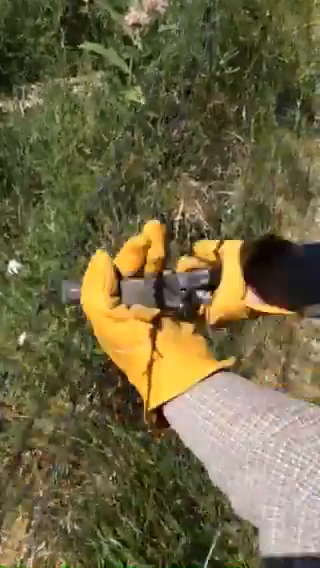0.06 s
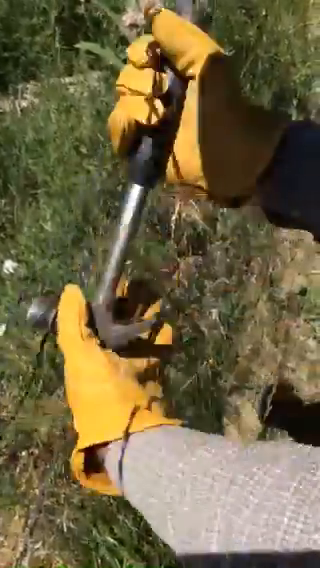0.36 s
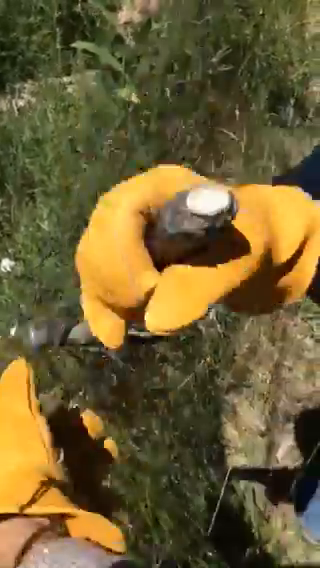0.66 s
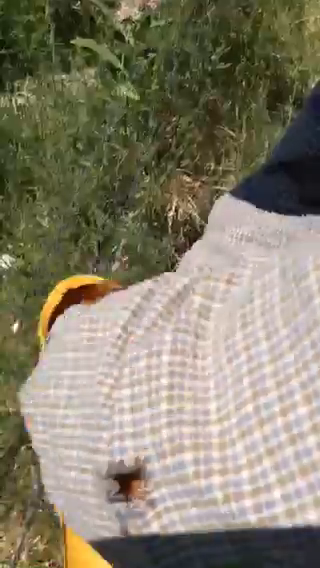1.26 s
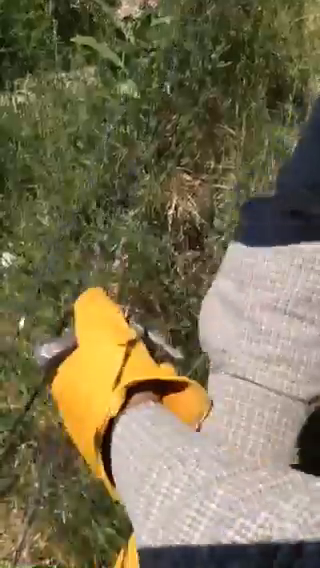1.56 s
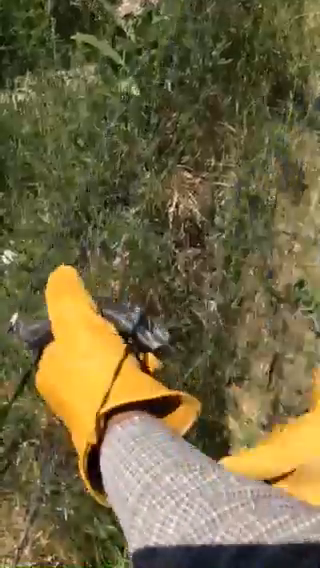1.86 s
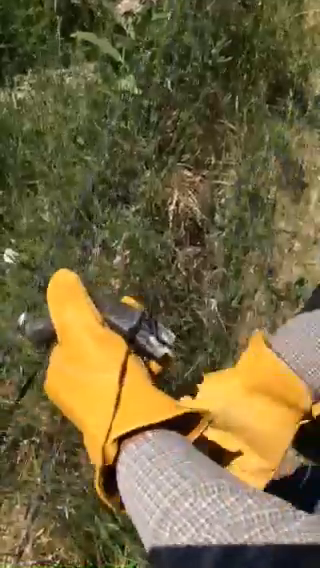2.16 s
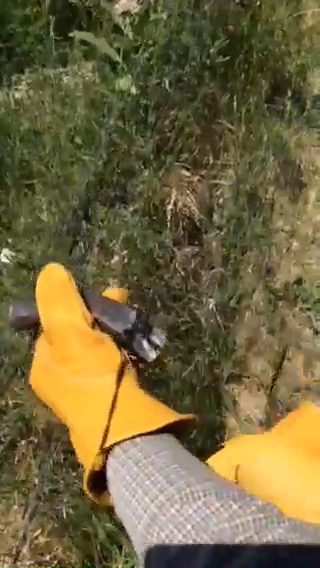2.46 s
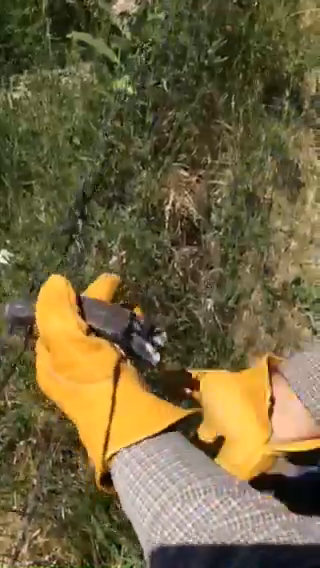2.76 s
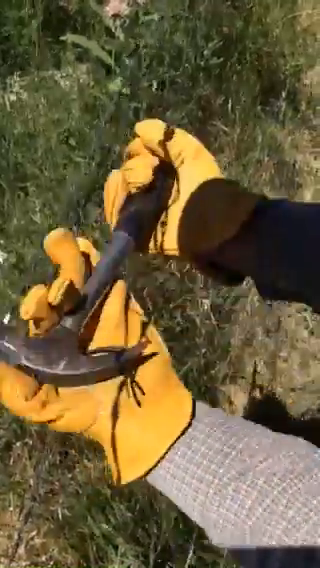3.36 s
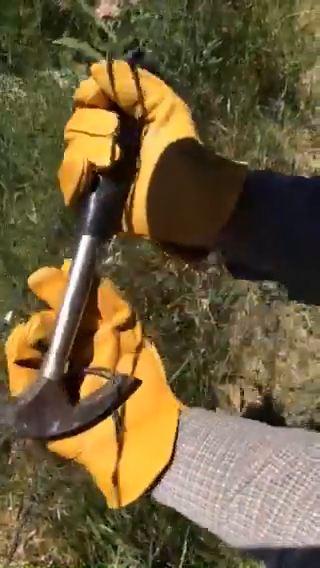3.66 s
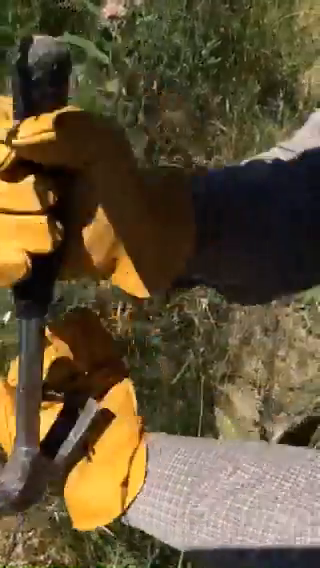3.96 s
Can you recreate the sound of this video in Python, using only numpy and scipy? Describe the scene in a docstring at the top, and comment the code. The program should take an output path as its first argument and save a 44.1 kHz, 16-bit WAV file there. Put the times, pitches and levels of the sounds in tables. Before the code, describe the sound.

Gusts rumble and thump on a close microphone over faintly hissing grass. A sleeve swishes by, a wire slips on a claw hammer with a quick metallic snap and later a single crack, and leather gloves rustle softly.

```python
"""Fence wire and claw hammer in wind

Outdoors over grass, gloved hands turn a claw hammer that grips a fence wire. The wire slips, snaps
against the steel twice (a quick cluster, then one crack) and ticks faintly. Woven sleeves zip past the
microphone as their ribs catch; leather gloves rustle and squeak once. Gusts buffet the microphone
port with low thuds, over a faint hiss of grass."""
import sys
import numpy as np
from scipy import signal
from scipy.fft import rfft, irfft, next_fast_len
from scipy.io import wavfile
from scipy.ndimage import uniform_filter1d, map_coordinates

SR = 44100
rng = np.random.default_rng(int(sys.argv[2]) if len(sys.argv) > 2 else 0)


def waveform_to_disk(signal):
    """Save audio, clipped to [-1, 1], as 16-bit WAV at the path in sys.argv[1]."""
    frames = np.transpose(np.atleast_2d(signal))
    scaled = np.clip(frames, -1, 1) * 32767
    samples = np.round(scaled).astype(np.int16)
    wavfile.write(sys.argv[1], SR, samples)


N = 176400

# spectrum of wire cracks and grass crackle: freq_hz, gain_db
CRACK_COLOUR = [(150, -26), (430, 0), (1000, -12.5), (1450, 5.5), (1800, -9), (2300, 0), (4500, -4.5),
                (6400, -2), (8300, -3.5), (10200, -2.5), (11500, -14.5), (16000, -13.5)]


def amp(db):
    """dB to gain."""
    return 10 ** (np.asarray(db) / 20)


def unit(x):
    """Scale to rms 1."""
    return x / np.sqrt(np.mean(x ** 2) + 1e-20)


def colour(points, hz):
    """Gain at hz from (freq_hz, gain_db) points, on a log axis."""
    f, db = np.transpose(points)
    return amp(np.interp(np.log(hz + 1), np.log(f + 1), db))


def curves(rows):
    """One per-sample curve for each column after time_s."""
    time_s, *columns = np.transpose(rows)
    return [np.interp(np.arange(N) / SR, time_s, column) for column in columns]


def wobble(rate_hz):
    """Smooth random curve, rate_hz knots a second."""
    return map_coordinates(rng.standard_normal(N // 8), [np.arange(N) * rate_hz / SR], mode="wrap")


def filtered(x, response):
    """Zero-phase filter with gain response(freq_hz)."""
    size = next_fast_len(len(x) + 4096)
    return irfft(rfft(x, size) * response(np.fft.rfftfreq(size, 1 / SR)), size)[:len(x)]


def noise(response, size=N):
    """Coloured noise, rms 1."""
    return unit(filtered(rng.standard_normal(size), response))


def band(centre_hz, size, half_width_oct=0.74):
    """Soft-edged noise band, rms 1."""
    return noise(lambda f: 1 / np.hypot(1, (np.log2((f + 1) / centre_hz) / half_width_oct) ** 3), size)


def burst(envelope):
    """Enveloped noise, flattened so that a short crack stays broadband."""
    spectrum = rfft(envelope * rng.standard_normal(len(envelope)))
    power = np.abs(uniform_filter1d(np.abs(spectrum) ** 2, size=400))
    return irfft(spectrum / np.sqrt(power + 1e-12))


def around(samples):
    """Time in s, this many samples either side of an event."""
    return np.arange(-samples, samples) / SR


def add(track, centre_s, sound):
    """Mix in a sound, its middle at centre_s."""
    start = round(centre_s * SR) - len(sound) // 2
    a, b = max(start, 0), min(start + len(sound), N)
    track[a:b] += sound[a - start:b - start]


def wire_snaps(t, onset, tail_db=-27.5, tail_t60_s=0.19, twang_hz=783, twang_db=-27.5, twang_t60_s=0.13):
    """The wire slips on the claw: each snap cracks, rings the steel and leaves a short twang."""
    # start_s, level_db, crack_t60_s, tilt_db_per_oct, ring_db
    snaps = [(1.2997, -52, 0.06, 1, -1), (1.3060, -27.5, 0.017, -2, -5.5), (1.3091, -25.5, 0.014, -2, -0.5),
             (1.3198, -39.5, 0.022, -0.5, 3.5), (2.5797, -24, 0.01, 2.3, -22.5)]
    out, age_s = np.zeros(N), np.maximum(t, 0)
    partials = sum(np.sin(2 * np.pi * k * twang_hz * t) for k in (1, 2))
    twang = amp(twang_db - 60 * age_s / twang_t60_s) * partials
    for start_s, level_db, crack_t60_s, tilt_db_per_oct, ring_db in snaps:
        tilt = lambda f: amp(tilt_db_per_oct * np.log2(np.maximum(f, 1000) / 5000))
        fade = onset * (amp(-60 * age_s / crack_t60_s) + amp(tail_db - 60 * age_s / tail_t60_s))
        crack = filtered(burst(fade), lambda f: colour(CRACK_COLOUR, f) * tilt(f))
        crack *= np.linalg.norm(fade) / np.linalg.norm(crack)
        ring = amp(ring_db) * steel_ring(t, tilt)
        add(out, start_s, amp(level_db) * (crack + onset * (ring + twang)))
    return out


def steel_ring(t, tilt, blur_hz=70):
    """Hammer and wire ring together; the wire's chatter blurs each mode's phase."""
    # freq_hz, level_db, t60_s
    modes = [(1330, -12.5, 0.023), (1560, -5.5, 0.019), (2620, -10.5, 0.034), (3980, -5, 0.013),
             (4440, -4, 0.021), (5200, -1, 0.031), (5900, -5, 0.03), (6120, -0.5, 0.028),
             (7030, -16, 0.043), (9750, -8, 0.017)]
    ring = np.zeros(len(t))
    for freq_hz, level_db, t60_s in modes:
        decay = amp(level_db + 2 * rng.standard_normal() - 60 * np.maximum(t, 0) / t60_s)
        drift_rad = np.cumsum(rng.standard_normal(len(t))) * np.sqrt(2 * np.pi * blur_hz / SR)
        ring += tilt(freq_hz) * decay * np.sin(2 * np.pi * freq_hz * t + drift_rad)
    return ring


def wire_ticks(t, onset, t60_s=0.029):
    """Wire and claw tick faintly, without ringing."""
    # start_s, level_db, centre_hz
    ticks = [(0.421, -46.5, 1430), (0.571, -52.5, 13800), (0.731, -57, 8500), (1.368, -45.5, 1500),
             (1.8428, -57, 7700), (2.118, -62, 10000), (2.199, -63, 9500), (2.343, -60.5, 8000),
             (2.653, -47, 13500), (2.801, -53, 12200), (2.912, -58, 12900)]
    out = np.zeros(N)
    fade = onset * amp(-60 * np.maximum(t, 0) / t60_s)
    for start_s, level_db, centre_hz in ticks:
        add(out, start_s, amp(level_db) * fade * band(centre_hz, len(t)))
    return out


def wire(rise_s=0.00034):
    """Snaps and ticks, both with the sharp onset of a slip."""
    t = around(samples=8192)
    onset = np.exp(np.minimum(t, 0) / rise_s)
    return wire_snaps(t, onset) + wire_ticks(t, onset)


def friction(stroke, tone, rough, jitter):
    """A sliding surface catches and slips: an uneven pulse train plus noise."""
    rate_hz, level_db = curves(stroke)
    rate_hz *= 1 + jitter * wobble(1200) + rough * 0.0172 * wobble(130)  # slower term: arm speed
    phase = 2 * np.pi * np.cumsum(rate_hz) / SR
    t = np.arange(N) / SR
    moving = (t > stroke[0][0]) & (t < stroke[-1][0])
    pulses = np.zeros(N)
    pulses[moving] = sum(np.cos(k * phase[moving]) for k in range(1, 14))
    pulses = filtered(pulses, lambda f: colour(tone, f))
    pulses /= pulses[moving].std()
    catch = unit(amp(rough * 0.5 * wobble(400)))
    hiss = rough * noise(lambda f: colour(tone, f))
    return moving * amp(level_db) * catch * (pulses + hiss) / np.hypot(1, rough)


def zips_and_squeak():
    """Sleeve ribs catch at a rate set by arm speed, in three strokes; a glove gives one rising squeak."""
    # strokes: time_s, catch_rate_hz, level_db
    zip_out = [(.238, 1020, -68), (.255, 1200, -57), (.268, 1170, -57.5), (.288, 1100, -56.5),
               (.315, 790, -59.5), (.355, 720, -62)]
    zip_past = [(.86, 483, -77), (.89, 500, -57.5), (.94, 527, -59), (.965, 573, -43.5),
                (.987, 661.5, -46.5), (1.005, 678, -41.5), (1.022, 522, -46.5), (1.05, 537.5, -49),
                (1.08, 641.4, -49), (1.097, 766, -45.5), (1.12, 701.6, -53), (1.155, 600, -58),
                (1.19, 660, -61), (1.24, 488, -71)]
    zip_back = [(3.29, 782, -70), (3.305, 780, -58), (3.33, 818, -55), (3.345, 747, -51), (3.362, 633, -56),
                (3.4, 578, -69.5)]
    squeak = [(2.765, 950, -89), (2.785, 1800, -56.5), (2.8, 3000, -75)]
    # their spectra: freq_hz, gain_db
    out_colour = [(600, -43), (1150, 14), (2400, 1.5), (3500, 4.5), (5000, 7), (7000, -5), (12000, -22)]
    past_colour = [(200, -25), (650, -9), (950, -15), (1400, 7), (1900, 2.5), (2400, -13.5), (8000, -21),
                   (15000, -36)]
    back_colour = [(1600, -8), (2400, -4), (3100, -9), (4500, -22), (7000, -12.5), (13000, -26)]
    return (friction(zip_out, out_colour, rough=0.75, jitter=0.015)
            + friction(zip_past, past_colour, rough=0.8, jitter=0.04)
            + friction(zip_back, back_colour, rough=0.55, jitter=0.025)
            + friction(squeak, past_colour, rough=0.3, jitter=0.02))


def rustles(grain_db=2, lowpass_hz=10500):
    """Leather slides on the handle in soft, grainy swells; the swells between 0.89 and 1.0 s are a woven sleeve
    brushing past."""
    # centre_s, level_db, sigma_s, centre_hz
    rubs = [(0.251, -65.5, 0.098, 4740), (0.399, -48, 0.01, 1970), (.4, -63, 0.097, 8150),
            (0.44, -52.5, 0.018, 770), (0.467, -64, 0.081, 2900), (0.894, -50, 0.013, 1300),
            (0.907, -61.5, 0.027, 4500), (1, -58, 0.034, 5530), (2.649, -65, 0.052, 7600),
            (2.66, -65.5, 0.13, 2460), (3.101, -63, 0.062, 5160), (3.222, -65, 0.058, 4470),
            (3.99, -66.5, 0.037, 2900)]
    out, t = np.zeros(N), around(samples=16384)
    for centre_s, level_db, sigma_s, centre_hz in rubs:
        swell = np.exp(-0.5 * (t / sigma_s) ** 2)
        add(out, centre_s, amp(level_db) * swell * band(centre_hz, len(t)))
    grain = amp(grain_db * wobble(500))
    return filtered(out * grain, lambda f: 1 / np.hypot(1, (f / lowpass_hz) ** 6))


def wind(port_hz=64, eddy_slope=0.39, pop_taper=4):
    """Rumble, short buffets and single eddies press on the microphone port."""
    # time_s, level_db
    rumble = [(0, -52.5), (.2, -49.5), (.46, -40), (.68, -37), (.82, -48.5), (1.03, -47.5), (1.2, -61.5),
              (1.29, -44), (1.53, -53.5), (1.62, -39.5), (1.88, -47), (2.25, -44), (2.34, -61.5),
              (2.46, -47), (2.64, -68.5), (2.85, -44.5), (2.96, -58.5), (3.26, -26), (3.54, -52.5),
              (4, -51)]
    # freq_hz, gain_db
    rumble_colour = [(15, -20), (35, -5.5), (65, 2), (110, -2.5), (200, -15), (350, -27.5), (600, -31),
                     (1200, -114)]
    # centre_s, level_db, sigma_s, cutoff_hz
    buffets = [(0.044, -38, 0.011, 238), (0.31, -26.5, 0.0086, 421), (0.379, -34, 0.0062, 355),
               (0.52, -27, 0.009, 440), (0.6, -24.5, 0.012, 500), (0.645, -28, 0.023, 272),
               (0.695, -31.5, 0.024, 200), (0.747, -29, 0.0059, 382), (1.59, -29, 0.011, 191),
               (1.651, -30, 0.011, 228), (1.703, -32, 0.0085, 251), (1.75, -27, 0.01, 470),
               (1.835, -34.5, 0.016, 220), (1.944, -31, 0.0053, 284), (2.004, -24.5, 0.011, 500),
               (2.102, -25.5, 0.0094, 525), (2.798, -37, 0.012, 330), (2.851, -32, 0.011, 198),
               (3.111, -24.5, 0.005, 344), (3.225, -27, 0.013, 510), (3.276, -19.5, 0.0076, 670),
               (3.333, -26.5, 0.0046, 454), (3.359, -25.5, 0.0068, 366), (3.474, -31.5, 0.013, 240),
               (3.922, -35.5, 0.004, 145)]
    # tight eddies, one pop each: centre_s, peak_db, brightness_hz
    eddies = [(0.3021, -26, 315), (.319, -23.5, 186), (.505, -21, 106), (.526, -24, 315),
              (0.597, -23.5, 280), (.655, -22.5, 263), (0.7243, -25.5, 353), (1.057, -35, 123),
              (1.291, -35.5, 172), (1.393, -33, 110), (1.747, -17, 196), (1.9954, -19.5, 294),
              (2.006, -18.5, 394), (2.0882, -20.5, 297), (2.0963, -14, 306), (2.803, -39, 340),
              (3.1168, -22.5, 270), (3.209, -22.5, 343), (3.244, -16.5, 225), (3.2685, -12.5, 287),
              (3.283, -12, 590), (3.3001, -11.5, 367), (3.342, -11, 556), (3.711, -26, 83)]
    rumble_db, = curves(rumble)
    out = amp(rumble_db + 0.4 * wobble(24.98)) * noise(lambda f: colour(rumble_colour, f))
    t = around(samples=4096)
    port = lambda f: 1 / np.hypot(1, (port_hz / (f + 1)) ** 3)  # high-pass
    for centre_s, level_db, sigma_s, cutoff_hz in buffets:
        swell = np.exp(-0.5 * (t / sigma_s) ** 2)
        spectrum = lambda f: port(f) / (f + 1) ** eddy_slope * np.exp(-(f / cutoff_hz) ** 2)
        puff = filtered(swell * rng.standard_normal(len(t)), spectrum)
        add(out, centre_s, amp(level_db) * puff * np.linalg.norm(swell) / np.linalg.norm(puff))
    for centre_s, peak_db, brightness_hz in eddies:
        u = 2 * np.pi * brightness_hz * t
        pressure = -u / (1 + u ** 2 / (2 * pop_taper)) ** pop_taper  # push, then suction
        pop = filtered(pressure, port)
        add(out, centre_s, amp(peak_db) * pop / np.abs(pop).max())
    return out


def grass(hiss_db=-65, crackle_db=-77, clicks_per_s=150, decay_s=0.00061, stir_db=0.93, lowpass_hz=12500):
    """Grass stirs: a faint hiss with a fine, dry crackle."""
    clicks = (rng.random(N) < clicks_per_s / SR) * rng.uniform(0, 1, N)
    envelope = signal.lfilter([1], [1, -np.exp(-1 / (decay_s * SR))], clicks)
    bursts = envelope * rng.standard_normal(N)
    crackle = amp(crackle_db) * unit(filtered(bursts, lambda f: colour(CRACK_COLOUR, f)))
    # freq_hz, gain_db
    hiss_colour = [(240, -34), (430, 3.5), (1040, -2), (2020, -5.5), (2800, -10), (8370, -15.5),
                   (16000, -21)]
    hiss = amp(hiss_db) * noise(lambda f: colour(hiss_colour, f))
    stir = amp(stir_db * wobble(14))
    return filtered((hiss + crackle) * stir, lambda f: 1 / np.hypot(1, (f / lowpass_hz) ** 4))


def scene():
    """All sources, close and dry, in mono."""
    return (wind() + wire() + zips_and_squeak() + rustles() + grass())[None]


def record(dry):
    """The microphone sheds the deepest bass and everything above its band limit."""
    highpass_hz, top_hz = 33, 16000
    trimmed = signal.sosfilt(signal.butter(2, highpass_hz, "highpass", fs=SR, output="sos"), dry)
    return np.array([filtered(channel, lambda f: f < top_hz) for channel in trimmed])


dry = scene()
out = record(dry)
waveform_to_disk(out)
```